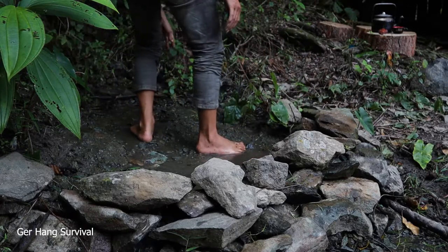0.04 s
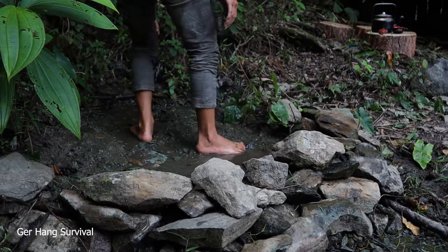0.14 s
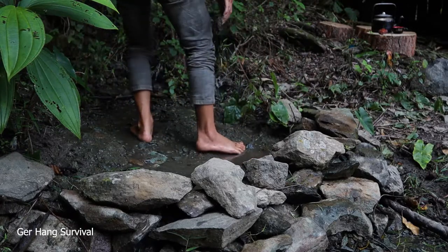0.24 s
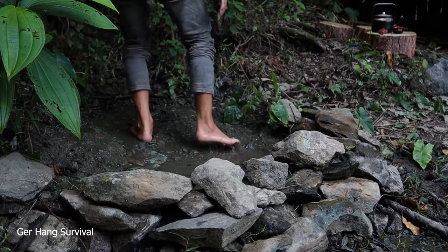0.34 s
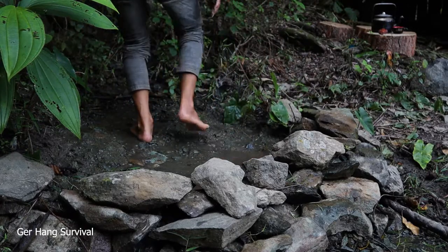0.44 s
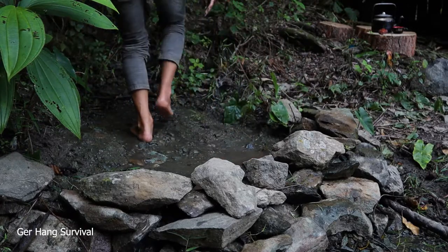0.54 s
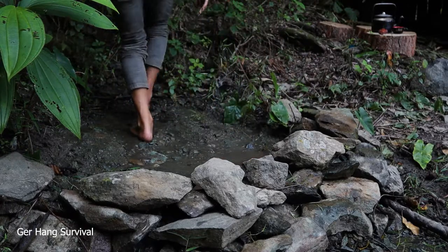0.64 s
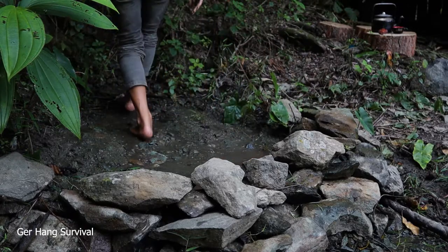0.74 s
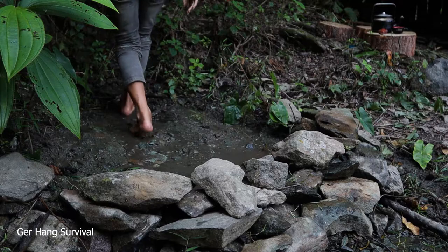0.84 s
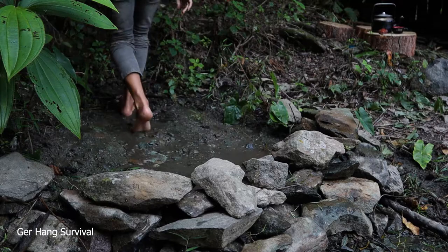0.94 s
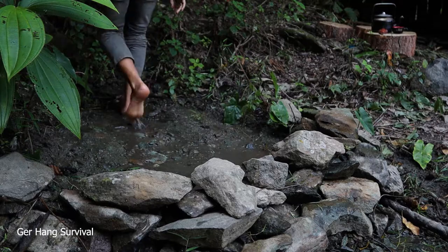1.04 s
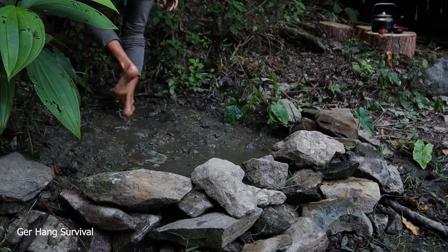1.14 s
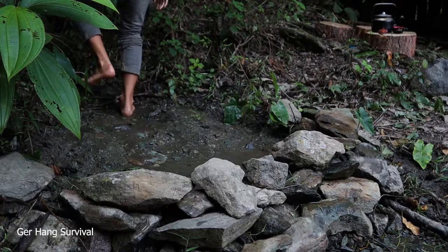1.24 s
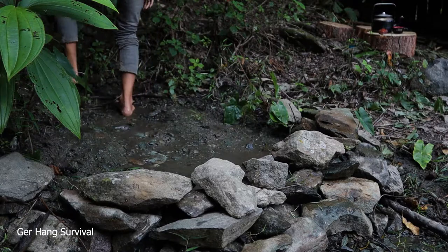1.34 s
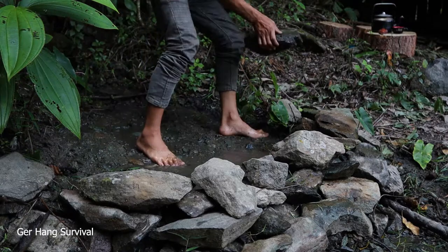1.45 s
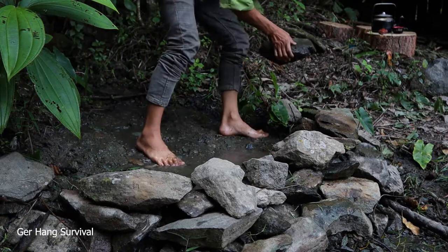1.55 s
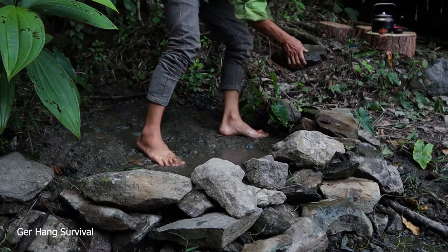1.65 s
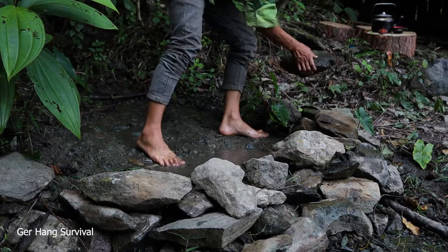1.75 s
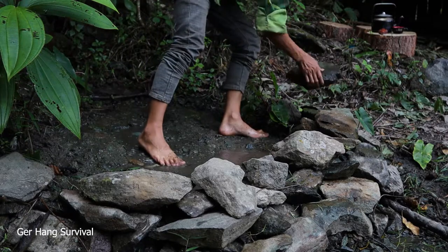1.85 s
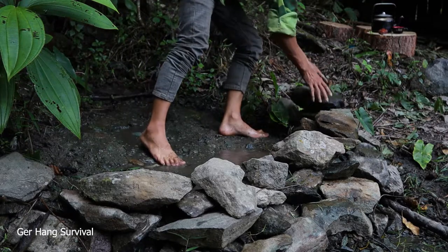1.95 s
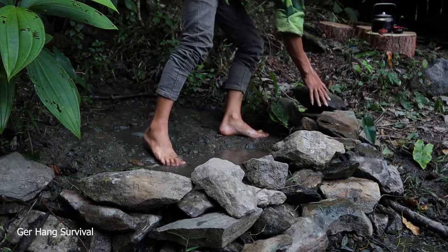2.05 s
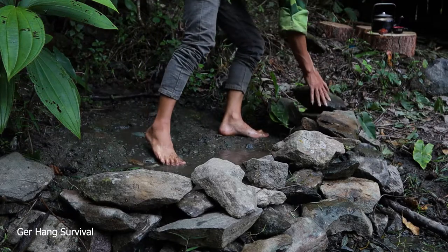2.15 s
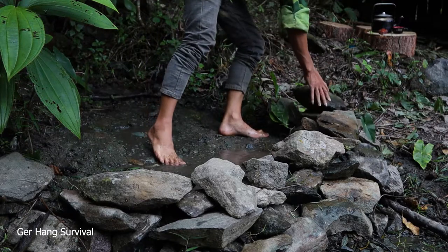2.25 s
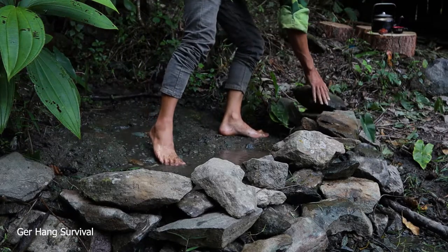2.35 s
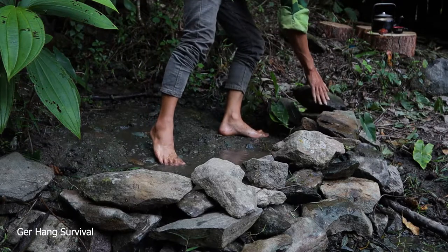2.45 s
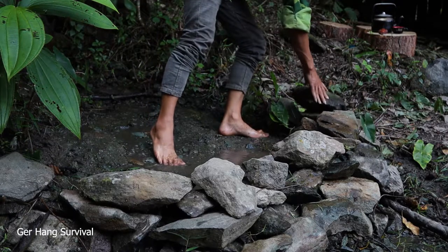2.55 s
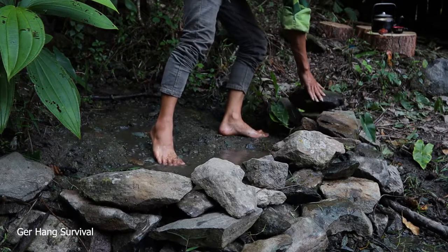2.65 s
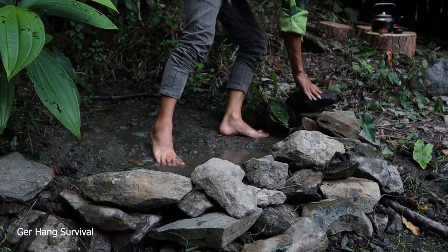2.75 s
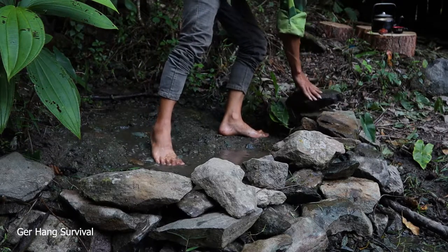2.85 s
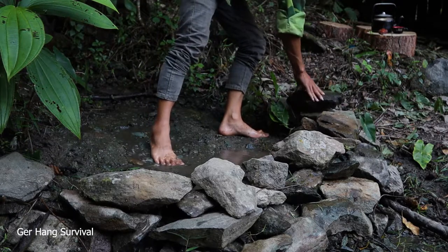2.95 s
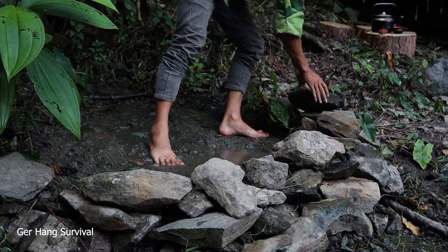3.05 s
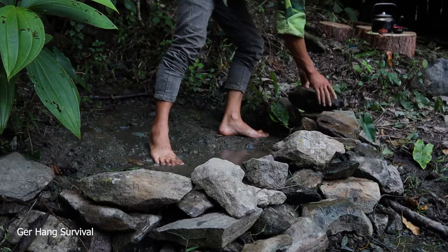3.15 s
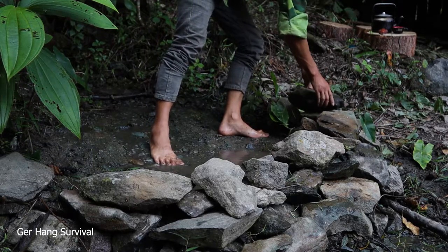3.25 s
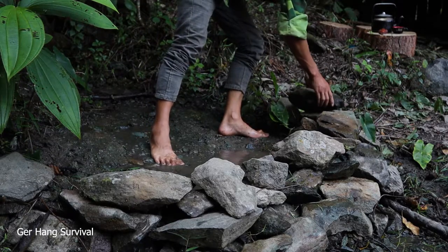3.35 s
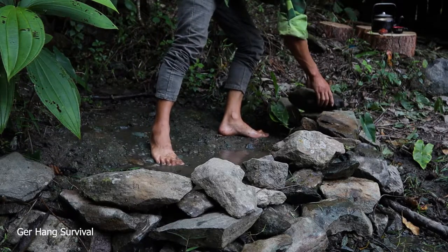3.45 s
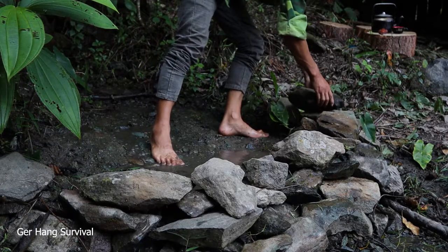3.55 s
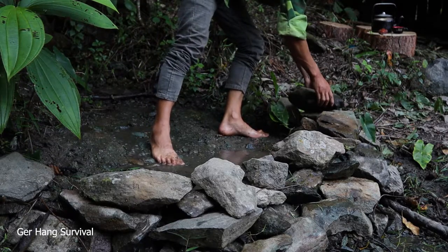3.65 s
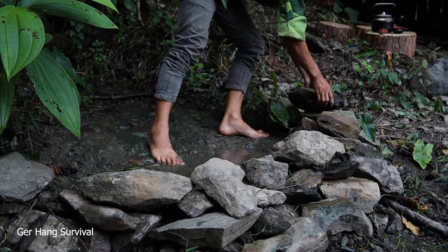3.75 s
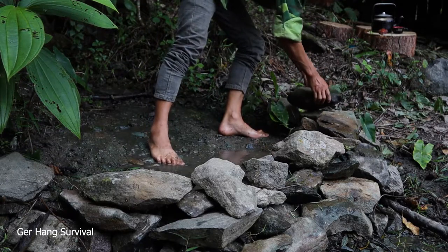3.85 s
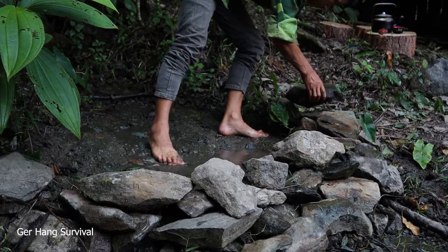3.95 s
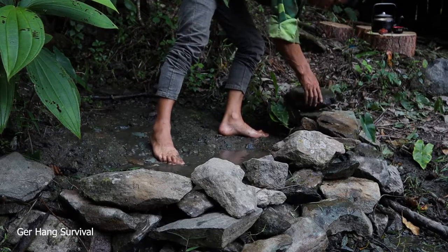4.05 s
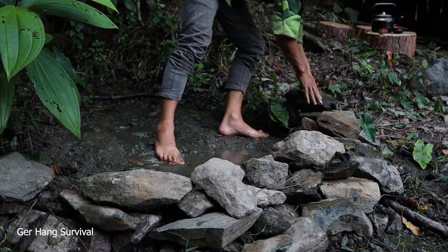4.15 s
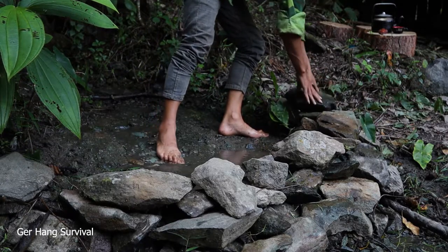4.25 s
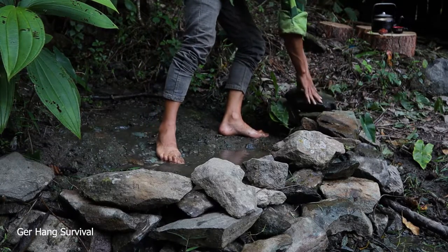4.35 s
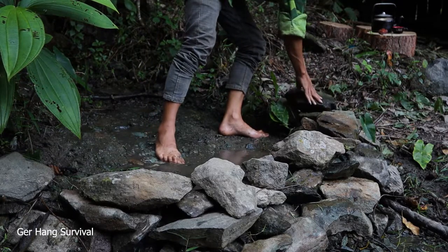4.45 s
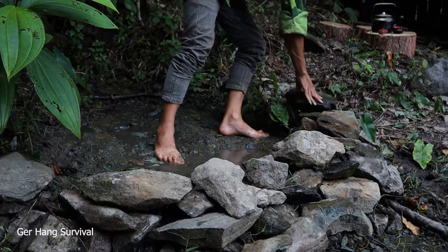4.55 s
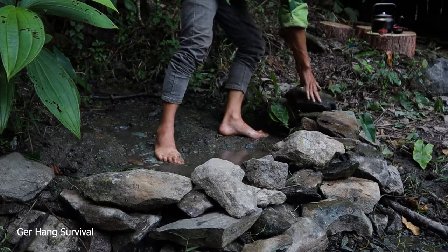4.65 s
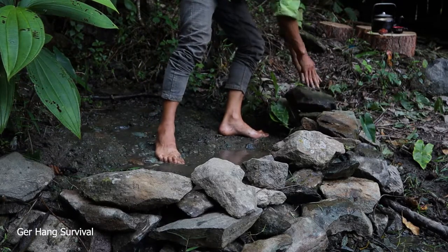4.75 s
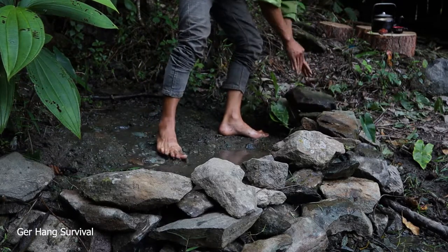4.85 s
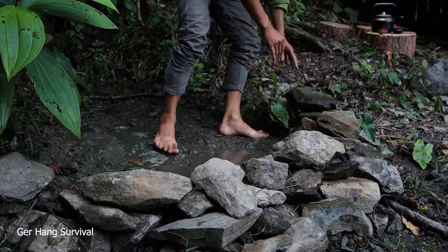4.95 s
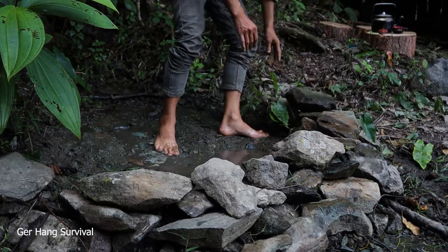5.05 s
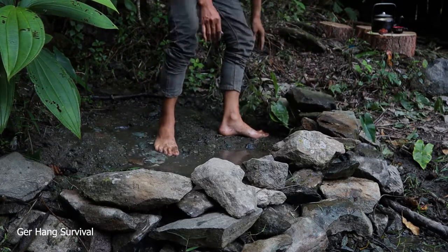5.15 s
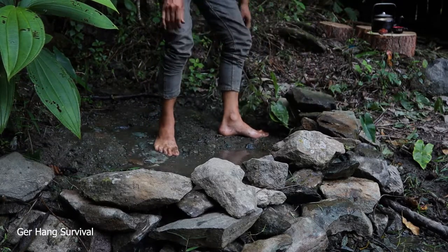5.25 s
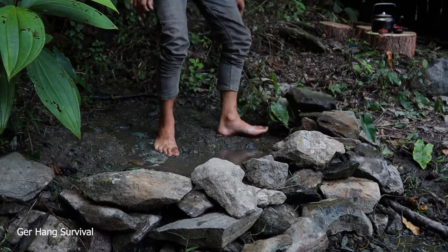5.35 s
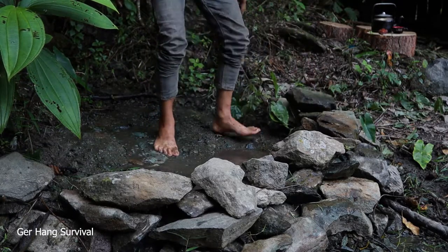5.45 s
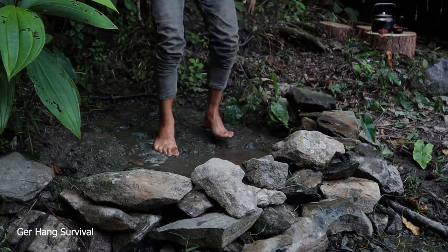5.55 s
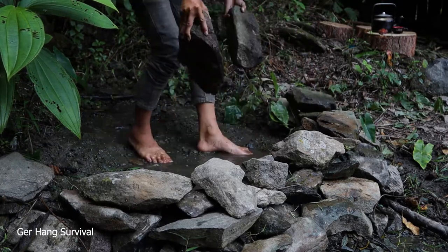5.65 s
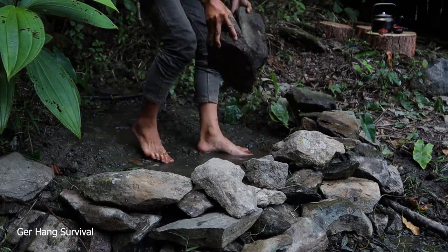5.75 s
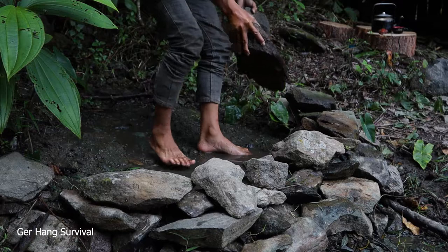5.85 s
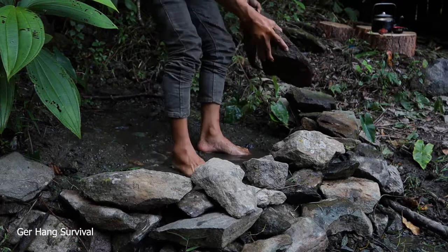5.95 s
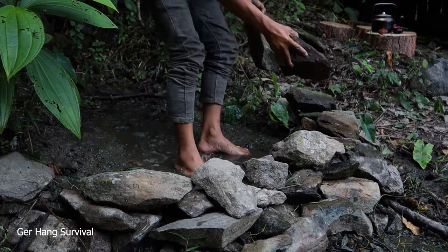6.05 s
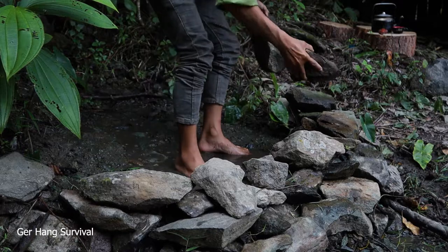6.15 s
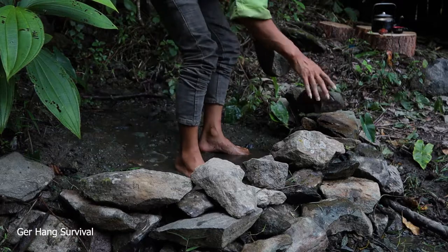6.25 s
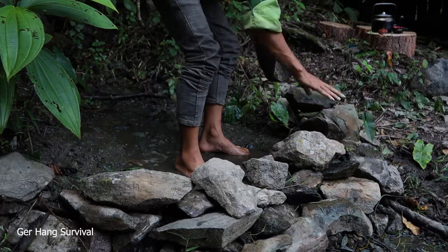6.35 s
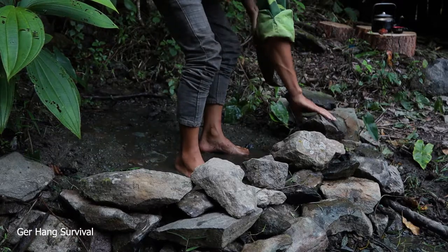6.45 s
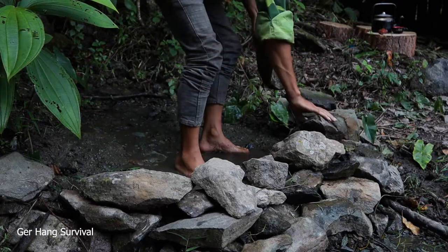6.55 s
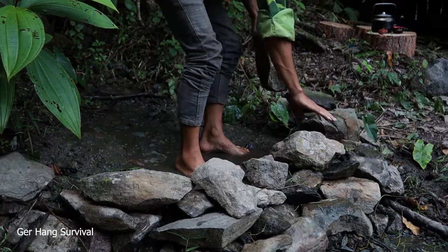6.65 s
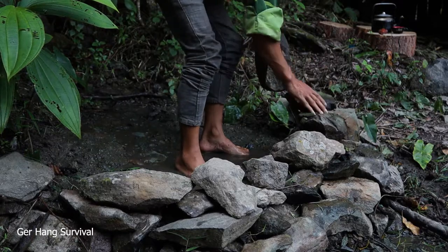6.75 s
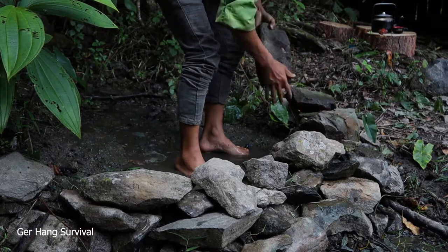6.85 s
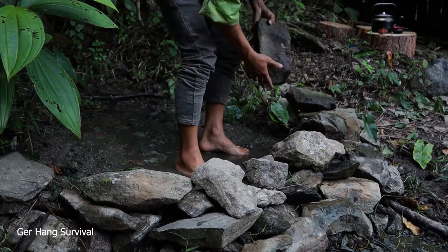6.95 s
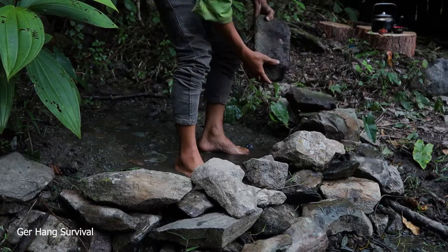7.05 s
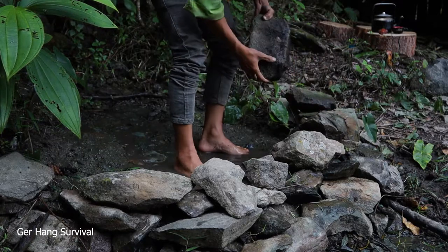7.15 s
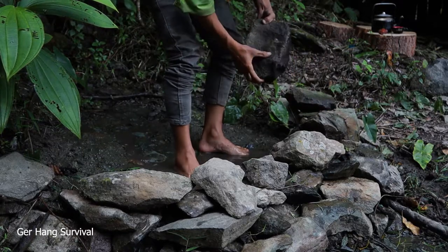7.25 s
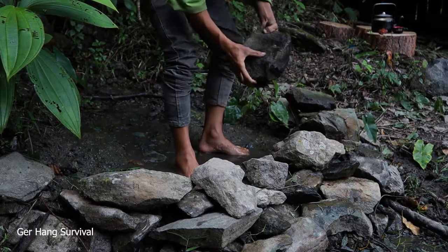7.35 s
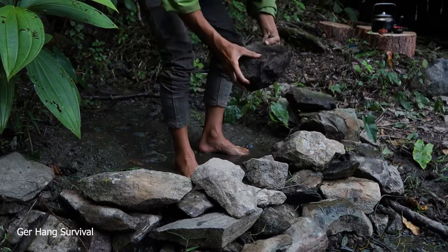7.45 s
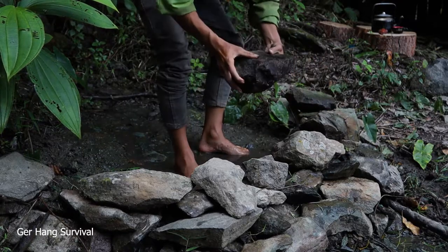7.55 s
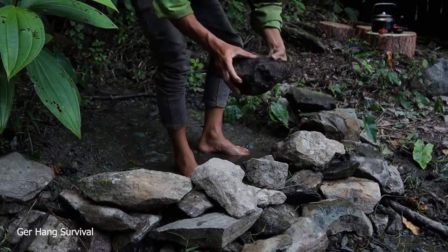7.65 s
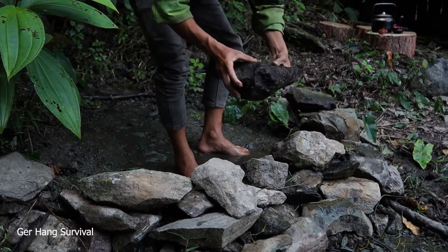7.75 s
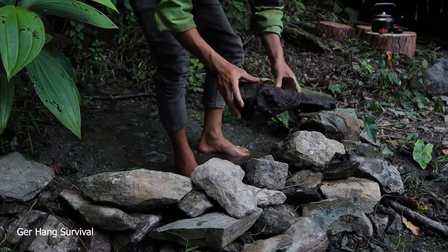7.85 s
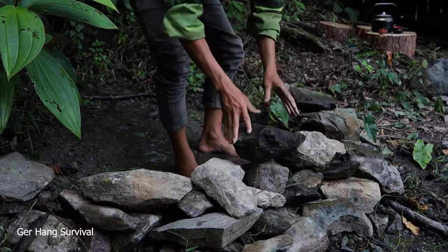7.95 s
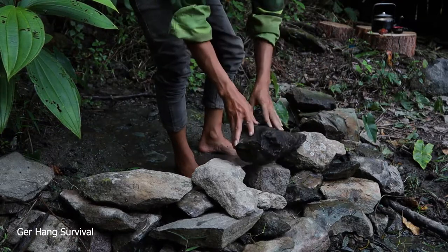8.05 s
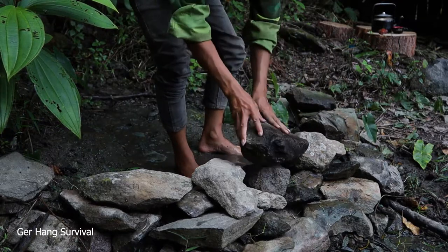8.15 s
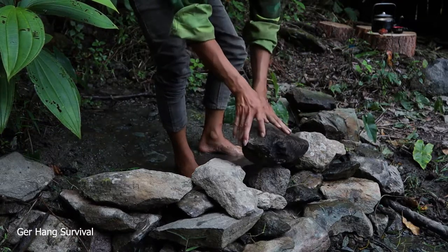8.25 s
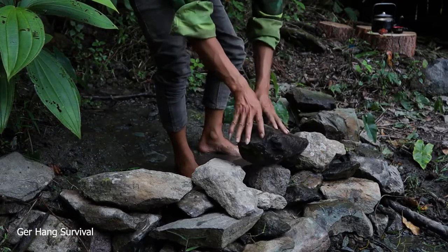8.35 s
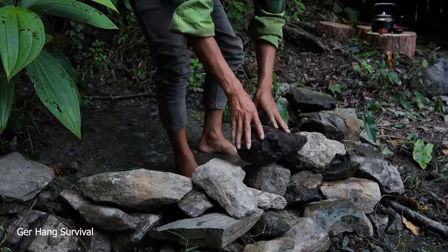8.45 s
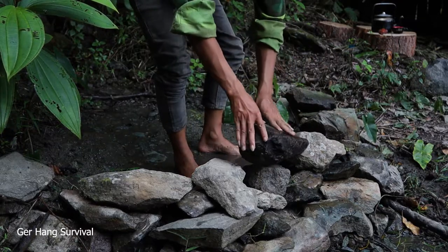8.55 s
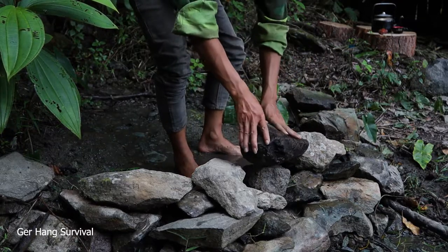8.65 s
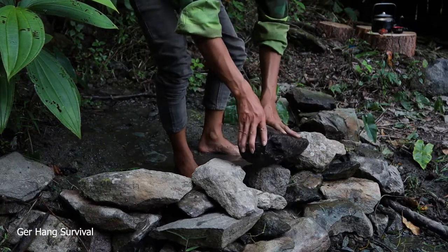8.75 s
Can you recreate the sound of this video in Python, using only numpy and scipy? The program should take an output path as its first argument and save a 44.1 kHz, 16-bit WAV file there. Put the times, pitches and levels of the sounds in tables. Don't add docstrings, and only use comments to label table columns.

```python
import sys
import numpy as np
from scipy import signal
from scipy.io import wavfile
from scipy.ndimage import uniform_filter1d

SR = 44100
rng = np.random.default_rng(int(sys.argv[2]) if len(sys.argv) > 2 else 0)


def file_out(sig):
    cols = np.atleast_2d(sig).T
    lim = np.clip(cols, -1, 1)
    pcm = np.round(lim * 32767).astype(np.int16)
    wavfile.write(sys.argv[1], SR, pcm)


def ratio(d):
    e = np.asarray(d, float) / 20
    return 10 ** e


N = 388517
DRIP_T60_S = 0.016


def band(x, hz, width):
    edges = np.clip([hz - width / 2, hz + width / 2], hz / 4, SR / 2.2)
    return signal.lfilter(*signal.butter(2, edges, "band", fs=SR), x)


def unit(x):
    return x / np.sqrt(np.mean(x ** 2))


def noise_band(count, hz, width):
    return unit(band(rng.standard_normal(count), hz, width))


def add(out, s, x):
    i = int(s * SR)
    out[i:i + len(x)] += x[:len(out) - i]


def fade(t60):
    t = np.arange(int(t60 * SR) + 8) / SR
    return t, 1000. ** (-t / t60)


def ring(hz, t60, rise=0.):
    t, env = fade(t60)
    return np.sin(2 * np.pi * hz * t) * env * (1 - np.exp(-t / (rise + 1 / SR)))


def walk(rate):
    k = int(SR / rate)
    steps = np.repeat(rng.standard_normal(N // k + 1), k)
    return unit(uniform_filter1d(uniform_filter1d(steps, k), k)[:N])


def forest():
    # pitch_hz, density_db (per Hz)
    spectrum = [(15, -31), (25, -4.5), (43, 0.5), (256, -1.5), (335, -3), (1020, -4), (1100, -5),
                (2160, -7), (2480, -11.5), (3720, -12.5), (4140, -1.5), (5280, -13), (7110, -11),
                (14800, -20.5), (16000, -22.5)]
    knots_hz, knots_db = np.transpose(spectrum)
    swell = walk(0.55)
    out = np.zeros(N)
    for hz in 30 * 2 ** np.arange(0, 9.1, 0.5):
        density_db = np.interp(np.log(hz), np.log(knots_hz), knots_db)
        flicker_db = (0.4 + hz / 20000) * walk(9)
        db = density_db + 10 * np.log10(hz) + 0.5 * swell + flicker_db
        out += ratio(db) * noise_band(N, hz, hz / 2.69)
    return ratio(-50.5) * unit(out)


def chorus():
    # pitch_hz, width_hz, level_db, throb_depth_db
    voices = [(4180, 500, -59, 0), (4750, 450, -63, 5.5), (6700, 1100, -70, 1)]
    throb_s, throb_peak_s = 0.184, 0.024
    t = np.arange(N) / SR
    throb = np.cos(2 * np.pi * (t - throb_peak_s) / throb_s)
    out = np.zeros(N)
    for hz, width, db, depth_db in voices:
        flicker_db = walk(3) + 1.3 * walk(40)
        out += ratio(db + depth_db * throb + flicker_db) * noise_band(N, hz, width)
    return out


def cricket():
    # time_s, level_db
    loudness = [(0, -70), (1, -65), (2.3, -59), (4, -60), (4.6, -70), (8.81, -67.5)]
    chirp_s, chirp_start_s, chirp_share = 0.2645, 0.178, 0.56
    stroke_hz, wing_hz = 53, 7320
    t = np.arange(N) / SR
    singing = (t - chirp_start_s) / chirp_s % 1 < chirp_share
    chirp = uniform_filter1d(1. * singing, 400)
    strokes = np.sin(np.pi * stroke_hz * t) ** 2
    level_db = np.interp(t, *np.transpose(loudness)) + 1
    return ratio(level_db) * chirp * strokes * noise_band(N, wing_hz, 160)


def patter():
    drops_per_s, pitch_hz, level_db = 10, 5500, -52
    out = np.zeros(N)
    t, env = fade(DRIP_T60_S)
    for when, size, tone in rng.random((drops_per_s * N // SR, 3)):
        hz = pitch_hz * 2 ** (2.2 * (tone - 0.5))
        add(out, when * N / SR, ratio(level_db + 5 * size) * env * noise_band(len(t), hz, 0.6 * hz))
    return out


def leaf_ticks():
    # start_s, level_db, pitch_hz
    ticks = [(0.181, -43, 6830), (0.9264, -39, 7340), (1.075, -39, 8440), (1.1293, -35, 6840),
             (1.3504, -40, 9160), (1.5668, -42, 7460), (2.1465, -46, 7900), (2.5396, -42, 11800),
             (2.7196, -38, 10300), (2.9572, -41, 9500), (3.1193, -46, 7040), (3.1298, -45, 8340),
             (3.2014, -39, 8330), (5.0459, -47, 8080), (5.0754, -37, 8940), (5.085, -39, 7370),
             (5.2051, -43, 10600), (5.4196, -41, 7700), (5.6745, -43, 9420), (6.2093, -43, 8140),
             (6.2334, -43, 6540), (6.2577, -41, 8280), (6.8538, -45, 9000), (7.3163, -44, 7420),
             (7.43, -41, 8410), (8.752, -40, 8460), (1.4321, -44, 5700), (2.8519, -43, 7280),
             (2.0348, -33, 8140), (6.0352, -38, 8220), (6.2786, -41, 9240), (6.3215, -45, 6780),
             (1.0545, -41, 7350), (1.645, -46, 8000)]
    out = np.zeros(N)
    t, env = fade(DRIP_T60_S)
    for s, db, hz in ticks:
        add(out, s, ratio(db - 4) * env * noise_band(len(t), hz, 0.4 * hz))
    return out


def film_snaps():
    # start_s, level_db, pitch_hz, spray_db (above 6 kHz)
    pops = [(0.2329, -35.5, 4200, -53), (0.4783, -39, 4170, -41), (0.8634, -36, 4730, -50),
            (0.8684, -26, 3660, -34), (0.8724, -28, 4560, -39), (0.8764, -24, 2950, -44),
            (0.8884, -35, 3040, -50), (0.9438, -35.5, 3220, -54), (1.0365, -22, 3100, -34),
            (1.0544, -34, 2800, -47), (1.1268, -30, 1550, -37), (1.1448, -23.5, 2750, -52),
            (1.2101, -37, 2840, -55), (1.2451, -30.5, 3300, -47), (1.2594, -33.5, 3360, -55),
            (1.4701, -42, 2190, -45), (3.036, -38, 2100, -38), (3.5468, -36, 3080, -55),
            (4.9114, -37, 1360, -47), (4.9207, -27, 2090, -49), (4.9334, -34, 2080, -55),
            (5.0918, -23, 3880, -44), (5.0993, -24, 3430, -49), (5.2939, -35, 1340, -54),
            (5.8775, -30.5, 3660, -49), (6.0334, -38, 3830, -48), (6.0412, -25.5, 4170, -38),
            (6.116, -41, 3550, -37), (6.5809, -29.5, 1450, -43), (6.6544, -38, 4280, -37)]
    # start_s, level_db, pitch_hz, t60_s,
    # spray_db (above 6 kHz)
    snaps = [(6.0495, -34, 2900, 0.012, -38), (6.0505, -39, 5400, .008, -50),
             (6.07, -21.5, 3400, 0.013, -34), (6.0706, -35, 5500, 0.0087, -50),
             (6.128, -36, 3100, .015, -44), (6.2065, -32, 3100, .01, -42), (6.2335, -29, 3700, 0.017, -40),
             (6.275, -31, 4000, 0.013, -37), (2.1165, -26, 680, 0.015, -60), (5.44, -38, 3040, .008, -60),
             (7.294, -43, 3400, .008, -60), (7.357, -38.5, 3400, .008, -52),
             (6.5809, -29, 3900, 0.011, -50), (6.0585, -23, 3030, 0.012, -45),
             (1.1454, -25, 1600, 0.0058, -50), (1.037, -32, 4600, 0.0068, -52),
             (4.9213, -33, 1400, 0.022, -50), (1.1852, -33, 2900, .009, -55),
             (1.2234, -37, 3070, .008, -55)]
    films = []
    for s, db, hz, spray_db in pops:
        t60 = 0.0085 + 0.00017 * (db + 35)
        films.append((s, db, hz, t60, spray_db))
    out = np.zeros(N)
    t, env = fade(0.007)
    for s, db, hz, t60, spray_db in films + list(snaps):
        add(out, s, ratio(db) * ring(hz, t60, rise=0.0001))
        add(out, s, ratio(db - 7) * env * noise_band(len(t), hz, 0.87 * hz))
        add(out, s, ratio(spray_db - 3.5) * env * noise_band(len(t), 9000, 7000))
    return out


def crackle(count, length, hz):
    spread_octaves, grain_cycles, scatter_db = 0.45, 9, 2
    when, size, phase = rng.random((count, 3)).T
    pitch = hz * 2 ** (spread_octaves * rng.standard_normal(count))
    pitch = np.clip(pitch, 100, 13000)[:, None]
    t = np.arange(400) / SR
    grain_db = -60 * t * pitch / grain_cycles - scatter_db * np.log(size)[:, None]
    grains = np.sin(2 * np.pi * (pitch * t + phase[:, None])) * ratio(grain_db)
    place = (when * length * SR).astype(int)[:, None] + np.arange(len(t))
    return unit(np.bincount(place.ravel(), grains.ravel(), int(length * SR) + len(t)))


def squelch():
    # start_s, length_s, level_db, centre_hz
    bursts = [(.86, .045, -43.5, 3430), (.868, .012, -49, 7500), (.879, .046, -57, 8000),
              (1.033, .13, -58, 6860), (1.118, .17, -52, 2480), (1.439, .1, -53.5, 3020),
              (2.018, .04, -36, 2700), (2.018, .05, -52, 7500), (3.1, .24, -62, 9000),
              (4.187, .025, -43, 2300), (4.895, .084, -50.5, 1900), (4.893, .06, -57, 8500),
              (5.051, .075, -54, 3800), (5.08, .02, -48, 7000), (5.273, .054, -51.5, 1530),
              (5.393, .07, -53.5, 5000), (6.045, .053, -47, 8000), (6.061, .043, -46.5, 2500),
              (6.1, .082, -50, 3260), (6.205, .028, -50, 3500), (6.199, .097, -42, 1020),
              (6.228, .045, -45, 5000), (6.25, .065, -49, 3000), (6.291, .04, -46, 1200),
              (8.05, .1, -48, 2600)]
    out = np.zeros(N)
    for s, length, db, hz in bursts:
        grains_per_s = 900 * np.sqrt(hz / 1000)
        grains = crackle(int(length * grains_per_s) + 2, length, hz)
        swell = np.sin(np.pi * np.linspace(0, 1, len(grains)) ** 0.45)
        add(out, s, ratio(db + 2.5) * swell * grains)
    return out


def fly():
    # closest_s, wingbeat_hz, level_db, fading_db_per_s (away from closest_s)
    passes = [(1.08, 302, -59, 50), (5.42, 286.8, -60, 45), (5.86, 282, -60, 50), (7.72, 303, -68, 70)]
    harmonics = [-1.5, 0, -1, -14, -7]
    s, hz, peak, fading = np.transpose(passes)
    t = np.arange(N) / SR
    db = np.max(peak[:, None] - fading[:, None] * np.abs(t - s[:, None]), axis=0)
    wingbeat_hz = np.interp(t, s, hz) * (1 + 0.006 * walk(15))
    phase = 2 * np.pi * np.cumsum(wingbeat_hz) / SR
    buzz = sum(ratio(d) * np.sin((k + 1) * phase) for k, d in enumerate(harmonics))
    return ratio(db + 1.5 * walk(12)) * buzz


def chips():
    # start_s, level_db, pitch_hz, t60_s
    splinters = [(2.0195, -26, 2100, .012), (2.0215, -24, 1600, .012), (2.025, -34, 2900, .01),
                 (2.0348, -30, 2500, .01), (2.048, -34, 2700, .012), (2.054, -32, 4000, .01),
                 (2.063, -24, 700, .015), (2.078, -34, 1100, .012), (4.1465, -38, 3600, .01),
                 (4.157, -34, 1200, .012), (4.161, -36, 900, .01), (4.1935, -28, 3400, .014),
                 (4.202, -36, 2400, .012), (4.2065, -42, 4700, .01), (4.213, -34, 700, .01),
                 (6.2085, -36, 4100, .012), (6.227, -40, 3600, .008), (6.234, -33, 4700, .01),
                 (6.244, -39, 3900, .01), (6.26, -39, 3600, .012), (6.306, -41, 4300, .012),
                 (6.307, -41, 3200, .01), (6.326, -40, 2700, .008), (8.0415, -20, 1400, .012),
                 (8.044, -26, 400, .02), (8.049, -30, 1500, .01), (8.062, -31, 1500, .01),
                 (8.068, -33, 1600, .01), (8.109, -36, 1300, .01), (8.116, -33, 1900, .01),
                 (8.194, -40, 1320, .012), (1.047, -38, 2900, .008), (1.094, -40, 4700, .008),
                 (1.137, -40, 3100, .008), (1.187, -38, 1200, .01), (1.2105, -40, 1800, .008),
                 (1.245, -37, 2400, .008), (1.252, -38, 3500, .01), (1.263, -38, 3900, .01),
                 (1.351, -40, 2600, .008), (1.471, -39, 3200, .008), (4.9215, -36, 2600, .012),
                 (4.925, -38, 1700, .012), (2.118, -34, 480, .02), (6.296, -38, 2600, .008)]
    out = np.zeros(N)
    for s, db, hz, t60 in splinters:
        add(out, s, ratio(db) * ring(hz, t60, rise=0.0003))
        add(out, s, ratio(db - 6) * ring(1.13 * hz, 0.7 * t60))
    return out


def nudges():
    # start_s, level_db, pitch_hz, t60_s
    presses = [(1.227, -49, 500, 0.015), (2.774, -40.5, 348, 0.021), (2.818, -47, 1120, 0.029),
               (2.831, -47, 570, 0.02), (2.861, -30.5, 234, 0.015), (3.31, -43, 886, 0.025),
               (5.177, -48, 750, 0.015), (6.459, -39, 1140, 0.025), (7.447, -45, 651, 0.021),
               (7.556, -47, 649, 0.022), (8.1155, -34, 1500, 0.012), (8.2015, -36, 150, 0.04),
               (8.464, -41, 290, 0.035), (8.619, -43, 415, 0.031), (8.719, -47.5, 606, 0.023)]
    out = np.zeros(N)
    for s, db, hz, t60 in presses:
        add(out, s, -ratio(db + 10) * ring(hz, t60, rise=0.001))
        add(out, s, ratio(db - 4) * ring(2.46 * hz, t60 * 0.42))
        t, env = fade(t60)
        add(out, s, ratio(db - 3) * env * noise_band(len(t), 1.3 * hz, 1.5 * hz))
    return out


def stone_blows():
    # (grit_db, grit_t60_s, grit_hz, crack_db, echo_db)
    rocking_stone = ( [(200, -21, .04), (364, -6.5, 0.035), (610, 6, 0.014), (813, -3, 0.023),
                     (1180, -2, 0.023), (1630, -24, .015), (2300, -15, .014), (2760, -15, .014),
                     (4000, -28, .02)], [(2.0195, -3, 0.45), (2.0208, -3, .4), (2.0235, -13, 0.47),
                     (2.0312, -8, 0.49), (2.036, -1, 0.5), (2.0395, -12, 0.33), (2.046, -12.5, 0.37),
                     (2.0525, -12.5, 0.31), (2.0545, -13, .4), (2.061, -20, 0.61)],
                     (-27, 0.09, 900, -36, -9))
    small_stone = ( [(270, -9, .025), (400, 3, 0.015), (620, -1.5, 0.017), (964, 1, 0.019),
                   (1250, -3, 0.015), (2000, -16, 0.012), (3000, -7, 0.012)], [(4.141, -31, 1),
                   (4.1456, -8.5, 0.4), (4.154, -24, 0.37)], (-20.5, 0.0063, 700, -30, 0))
    small_stone_tipped = ( [(220, -5, .035), (376, 2, .022), (598, -5, .02), (950, -8, .018),
                          (1500, -22, .015), (1960, -10, .015), (2450, -20, .03), (3150, -20, 0.012)],
                          [(4.187, -6, 0.23), (4.194, -19, 0.4), (4.199, -25, .5), (4.206, -28, 0.62)],
                          (-18.5, 0.02, 1000, -37, -16))
    flat_stone = ( [(202, -24, 0.032), (431, -16, .04), (560, -8, .03), (663, -7.5, .04), (815, -8, .03),
                  (931, -3.5, .035), (1163, -1.5, .03), (1448, -29, .04), (2310, -9, 0.031),
                  (2756, -23.5, .03), (3768, -32, .03)], [(6.3922, 5.5, 0.4), (6.3972, 3, 0.41),
                  (6.405, -13, 0.35)], (-23, 0.09, 1001, -32, -3))
    heavy_stone = ( [(260, -26, 0.025), (350, -12, .03), (562, -4, 0.016), (800, 1, 0.017),
                   (1000, 0, 0.016), (1230, 0, 0.019), (1630, -9, .025), (1960, -15, 0.025),
                   (2700, -8, 0.015), (3190, -4, .012), (4100, -9, .01), (6000, -2, .008)],
                   [(8.0289, -1, .2), (8.0297, 7, .3), (8.0313, -1, 0.5), (8.0335, -13, 0.4),
                   (8.061, -32, .2)], (-33, 0.08, 1196, -24, 0))
    out, blows = np.zeros(N), np.zeros(N)
    for modes, contacts, finish in (rocking_stone, small_stone, small_stone_tipped, flat_stone, heavy_stone):
        grit_db, grit_t60, grit_hz, crack_db, echo_db = finish
        for s, db, push_ms in contacts:
            spot = ratio(0.97 * rng.standard_normal(len(modes)))
            push = np.hanning(int(push_ms * SR / 1000) + 3)
            push = push / push.sum()
            for (hz, mode_db, t60), weight in zip(modes, spot):
                mode = np.convolve(ring(hz, t60, rise=0.00074), push)
                add(out, s, -ratio(db + mode_db) * weight * mode)
            add(blows, s, [ratio(db + echo_db)])
            t, env = fade(0.017)
            add(out, s, ratio(db + crack_db) * env * band(rng.standard_normal(len(t)), 4800, 6500))
            t, env = fade(grit_t60)
            grit = band(rng.standard_normal(len(t)), grit_hz, 1.62 * grit_hz)
            grit = unit(band(grit, grit_hz, 1.7 * grit_hz))
            add(out, s, ratio(db + grit_db + 7) * env * (1 - np.exp(-t / 0.00086)) * grit)
    return out, blows


def trees(blows):
    # pitch_hz, level_db, t60_s, build_up_s
    echoes = [(400, -43, 0.28, 0.043), (1100, -35, 0.42, 0.045), (2300, -40, 0.34, .05),
              (5000, -42, 0.2, 0.064)]
    tail = np.zeros(SR)
    for hz, db, t60, build in echoes:
        t, env = fade(t60)
        shape = env ** 1.25 * (1 - np.exp(-t / build)) ** 2
        flutter = ratio(8 + 1.2 * walk(200)[:len(t)])
        add(tail, 0.004, ratio(db) * shape * flutter * noise_band(len(t), hz, hz))
    return signal.fftconvolve(blows, tail)[:N]


def stones():
    struck, blows = stone_blows()
    bass_cut = signal.butter(2, 170, "high", fs=SR, output="sos")
    return signal.sosfilt(bass_cut, chips() + nudges() + struck) + trees(blows)


def ground():
    # start_s, level_db, pitch_hz
    shakes = [(2.021, -29, 90), (2.07, -33.5, 55), (4.146, -38, 100), (4.188, -36, 100), (4.2, -43, 55),
              (6.395, -32, 90), (6.432, -23, 52.5), (6.55, -35, 54), (8.028, -24, 115), (8.06, -32.5, 47.5),
              (8.201, -44.5, 60.3), (8.47, -47, 95), (8.499, -45, 50), (8.621, -48, 90)]
    rise_s, t60_s = 0.016, 0.27
    out = np.zeros(N)
    for s, db, hz in shakes:
        slow = (55 / hz) ** 2.4
        add(out, s, ratio(db + 5.5) * ring(hz, t60_s * slow, rise_s * slow ** 1.4))
    return out


def gulps():
    # start_s, level_db, start_hz, length_s, climb_share
    pockets = [(6.0712, -22, 1285, .0063, .07), (6.075, -42, 1140, .021, .1), (6.136, -43, 800, .015, .2),
               (6.1525, -29, 1600, .0085, .04), (6.1525, -28.5, 1000, .0034, .13),
               (6.163, -30, 1060, .017, .11), (6.18, -40, 1000, .01, .1), (6.2, -34, 480, .0073, .3),
               (6.2055, -22, 660, .015, .35), (6.211, -36, 2200, .006, .02), (6.2335, -19, 490, .007, .7),
               (6.234, -25, 1250, .022, .01), (6.236, -32, 1900, .007, .02), (6.2395, -19, 760, .011, .15),
               (6.248, -28, 720, .012, .1), (6.254, -28, 950, .009, .1), (6.221, -33, 1750, .009, .03),
               (6.264, -35, 450, .007, .2), (6.27, -26, 600, .009, .6), (6.27, -37, 2300, .011, .02),
               (6.28, -38, 1050, .008, .1), (6.288, -34, 1150, .009, .15), (6.2945, -30, 1720, .007, .03),
               (6.3, -39, 600, .014, .05), (6.303, -31, 1720, .01, .03), (6.322, -39, 400, .01, .2),
               (6.3255, -33, 1900, .009, .03)]
    out = np.zeros(N)
    for s, db, start_hz, length, climb in pockets:
        u = np.linspace(0, 1, int(length * SR))
        wobble = unit(uniform_filter1d(rng.standard_normal(2000), 60))
        phase = 2 * np.pi * np.cumsum(start_hz * (1 + climb * u)) / SR
        swell = np.sin(np.pi * u ** 0.57)
        add(out, s, ratio(db) * np.sin(phase) * swell * ratio(-2.5 + 2.4 * wobble[:len(u)]))
    return out


def scene():
    mud = leaf_ticks() + film_snaps() + squelch() + gulps()
    air = forest() + chorus() + cricket() + patter() + fly()
    return (air + mud + stones() + ground())[None]


def band_limit(x):
    return signal.sosfilt(signal.butter(12, 16850, fs=SR, output="sos"), x)


def record(dry):
    duck_db, release_s = -5.5, 0.15
    excess = np.clip(np.abs(dry[0]) - 0.7, 0, 0.6)
    overload = uniform_filter1d(excess, 300, origin=149)
    keep = np.exp(-1 / (release_s * SR))
    memory = signal.lfilter([1], [1, -keep], overload) / 18
    x = dry * ratio(duck_db * np.tanh(memory))
    x = signal.sosfilt(signal.butter(2, 42, "high", fs=SR, output="sos"), x)
    x = signal.sosfilt(signal.ellip(10, 0.1, 60, 15850, fs=SR, output="sos"), x)
    return band_limit(np.clip(x, -1, 1))


dry = scene()
out = record(dry)
file_out(out)
```